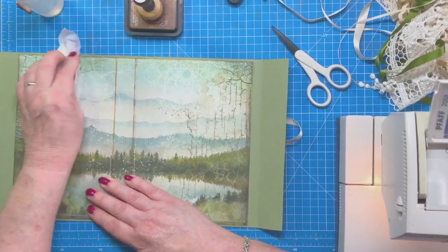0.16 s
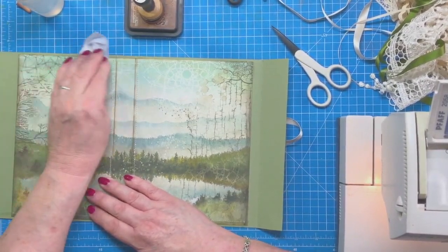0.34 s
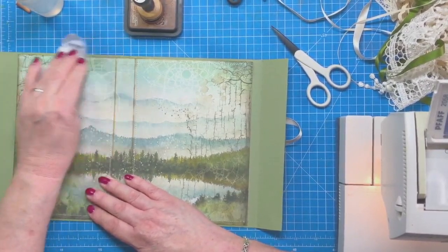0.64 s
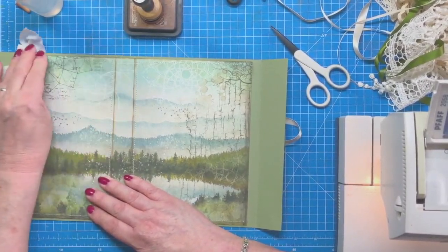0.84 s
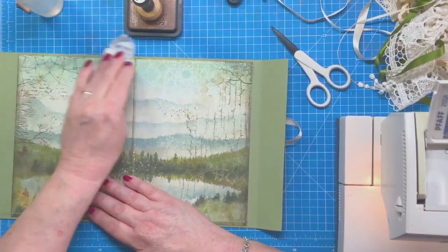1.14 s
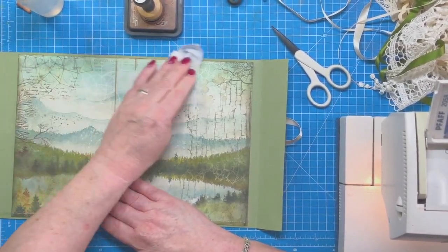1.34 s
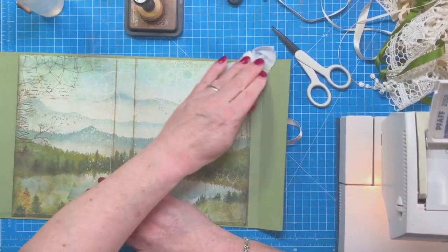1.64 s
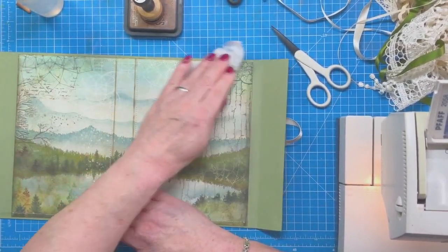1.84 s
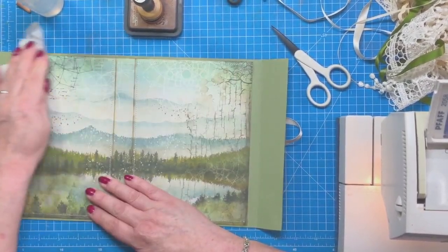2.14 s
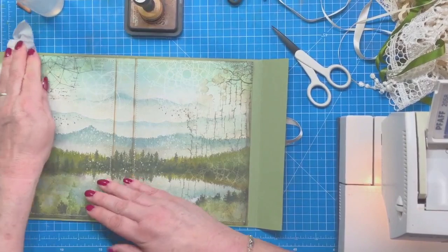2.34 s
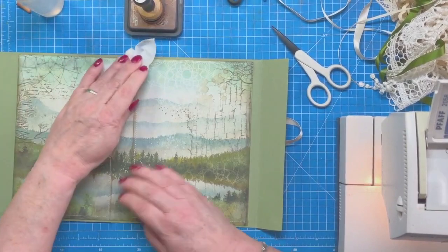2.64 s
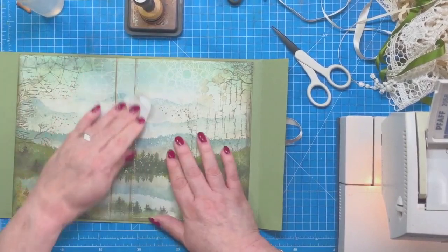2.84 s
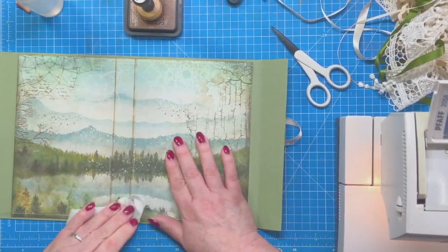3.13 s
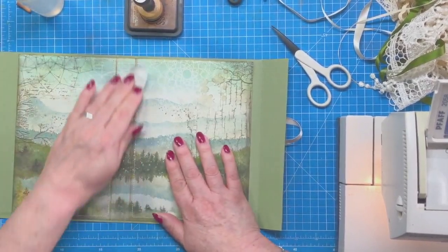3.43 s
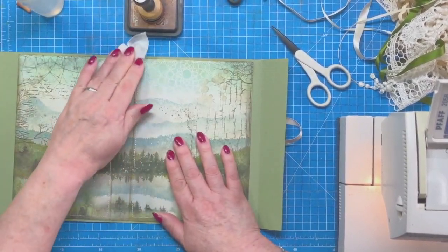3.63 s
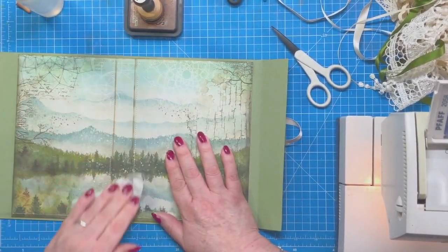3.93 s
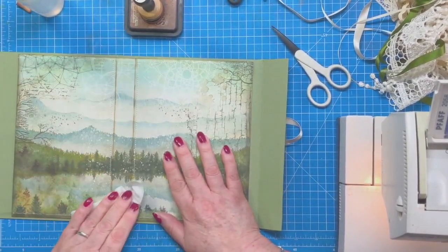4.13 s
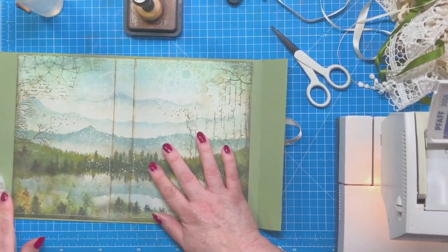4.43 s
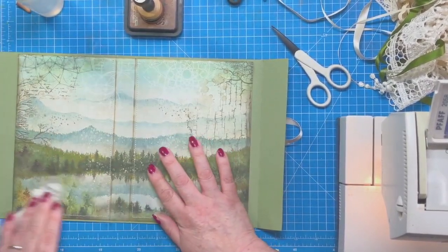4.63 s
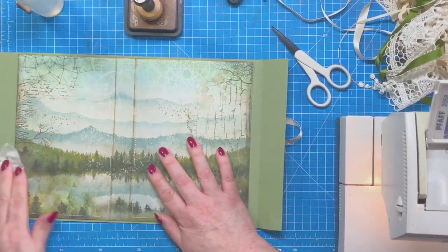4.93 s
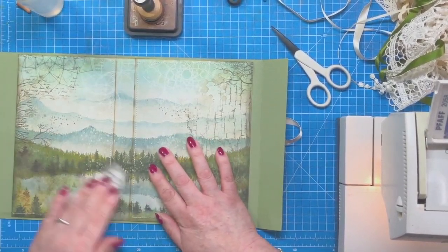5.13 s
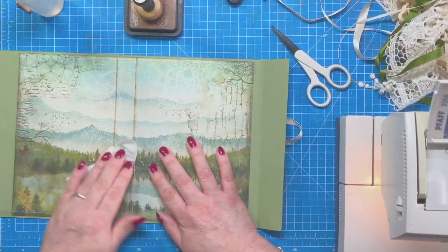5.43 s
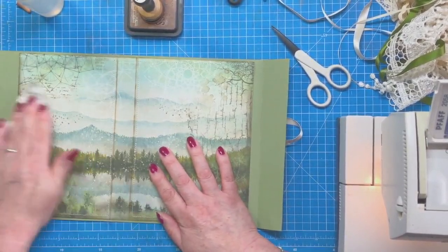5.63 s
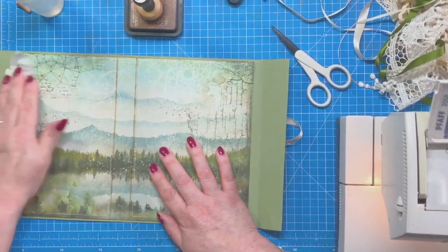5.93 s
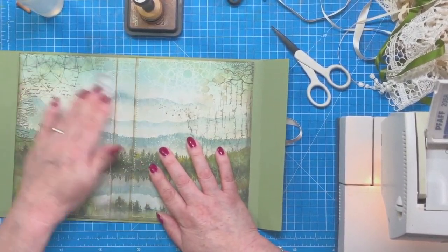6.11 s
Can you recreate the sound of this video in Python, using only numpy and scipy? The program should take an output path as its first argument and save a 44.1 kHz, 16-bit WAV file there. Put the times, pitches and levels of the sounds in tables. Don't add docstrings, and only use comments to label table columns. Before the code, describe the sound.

Close, crisp paper rubbing in uneven strokes with small crackles, a sharp clattering knock past midway, ending in fast, rhythmic scrubbing.

```python
import sys
import numpy as np
from scipy import signal
from scipy.fft import rfft, irfft, next_fast_len
from scipy.io import wavfile
from scipy.ndimage import uniform_filter1d

SR = 44100
rng = np.random.default_rng(int(sys.argv[2]) if len(sys.argv) > 2 else 0)


def how_loud(loudness_db):
    steps = np.asarray(loudness_db, float) / 20
    return 10 ** steps


def unload_wav(signal):
    wavfile.write(
        sys.argv[1],
        SR,
        np.round(np.clip(np.atleast_2d(signal).T, -1, 1) * 32767).astype(np.int16),
    )


N = 276507
USUAL_DB = -45


def level(x, db):
    return x * how_loud(db) / np.sqrt(np.mean(x ** 2))


def along(table):
    s, *columns = np.transpose(table)
    return [np.interp(np.arange(N) / SR, s, c) for c in columns]


def band(x, lo_hz, hi_hz):
    return signal.sosfilt(signal.butter(2, [lo_hz, min(hi_hz, 17000)], "band", fs=SR, output="sos"), x)


def colour(x, points, lo_hz=1., hi_hz=3e4):
    size = next_fast_len(len(x), True)
    hz = np.arange(size // 2 + 1) * SR / size + 1
    f, db = np.transpose(points)
    shape = how_loud(np.interp(np.log(hz), np.log(f), db))
    edges = 1 / np.sqrt((1 + (lo_hz / hz) ** 10) * (1 + (hz / hi_hz) ** 10))
    return irfft(rfft(x, size) * shape * edges, size)[:len(x)]


def walk(rate):
    k = int(SR / rate)
    steps = np.repeat(rng.standard_normal(N // k + 1), k)
    return 1.3 * uniform_filter1d(uniform_filter1d(steps, k), k)[:N]


def fade(t60, count):
    return 1000. ** (-np.arange(count) / SR / t60)


def ring(hz, t60, count=9000):
    return np.sin(2 * np.pi * hz * np.arange(count) / SR) * fade(t60, count)


def blow(hz, cycles):
    t = np.arange(-cycles / 2, cycles / 2, hz / SR)
    return np.cos(2 * np.pi * t) * np.cos(np.pi * t / cycles) ** 2


def add(out, s, sound):
    i = max(int(s * SR), 0)
    out[i:i + len(sound)] += sound[:N - i]


# pitch_hz, level_db (per Hz)
AIR_COLOUR = [(15, -47), (25, -27), (206, 1), (503, -8), (624, -7), (840, -4), (1370, -3.5), (1840, -6.5),
              (2280, -5.5), (3160, -15), (5280, -15), (5880, -11.5), (16000, -13.5)]
# pitch_hz, level_db (rms)
MAINS_HUM = [
    (118.4, -78.5),
    (398.4, -76.5),
    (597.5, -77),
]


def air():
    t = np.arange(N) / SR
    hum = np.zeros(N)
    for hz, db in MAINS_HUM:
        hum += np.sqrt(2) * how_loud(db + 2.0 * walk(5.88)) * np.sin(2 * np.pi * hz * t)
    return level(colour(rng.standard_normal(N), AIR_COLOUR), -61) + hum


# middle_s, low_hz, high_hz, level_db
SIDE_PATCHES = [(.6, 5150, 6300, -56), (.6, 11000, 12400, -57), (1.48, 10300, 12400, -64),
                (1.785, 4160, 6300, -51), (1.785, 7500, 9700, -56), (2.81, 8150, 9700, -54),
                (3.295, 8900, 10400, -55), (3.295, 14400, 15900, -68), (3.57, 5600, 7000, -76),
                (3.875, 4500, 5700, -58), (3.875, 6900, 8300, -60), (3.875, 9000, 11000, -59),
                (3.875, 13700, 15200, -68)]


def side_patches():
    out = np.zeros(N)
    for s, lo_hz, hi_hz, db in SIDE_PATCHES:
        steep_band = [(lo_hz - 30, -120), (lo_hz, 0), (hi_hz, 0), (hi_hz + 30, -120)]
        patch = colour(rng.standard_normal(8192), steep_band)[:2048]
        add(out, s - .023, level(patch, db) * np.hanning(2048) ** .5)
    return out


def stand():
    from_s, rise_s = 5.03, 0.043
    shake = level(colour(rng.standard_normal(N), [(50, 0), (300, 0)], 89, 197), -71.5) * how_loud(6.2 * walk(15))
    onset = np.clip((np.arange(N) / SR - from_s) / rise_s, 0, 1)
    return shake * how_loud(0.49 * (scrubs() - USUAL_DB)) * onset


# start_s, peak_db, favoured_hz, spread_octaves
BOUNCES = [(4.3551, -13, 1950, 0.91), (4.3564, -22, 3800, 0.55), (4.3633, -11, 2030, 0.39),
           (4.3638, -12.5, 3500, 0.46), (4.3665, -20, 2600, 0.74), (4.3678, -13.5, 1010, 0.48),
           (4.3706, -16.5, 700, 0.7), (4.371, -19, 2180, 0.52), (4.3744, -11, 1840, 0.4),
           (4.3782, -16.5, 810, 0.5), (4.3802, -21, 900, .7), (4.3825, -18, 750, 0.49),
           (4.3875, -20, 1100, 0.54), (4.392, -20, 1100, 0.54), (4.4, -28, 900, 0.73),
           (4.409, -24, 1200, 0.52), (4.4345, -24, 2770, .4), (4.4347, -26, 900, .6),
           (4.4368, -26, 2000, .6), (4.4384, -19.5, 720, 0.45), (4.4426, -25.5, 650, .5),
           (4.4443, -21, 900, 0.44), (4.4479, -21, 2300, 0.55), (4.448, -21, 1060, 0.58),
           (4.4508, -34, 1900, .6), (4.4517, -17, 1300, 0.38), (4.4533, -22, 850, 0.36),
           (4.455, -24, 554, 0.65), (4.4575, -29, 700, .6), (4.4592, -27, 604, 0.77),
           (4.4611, -23, 710, 0.35), (4.4637, -26, 850, 0.31), (4.4653, -17.5, 800, 0.75),
           (4.4694, -24.5, 750, 0.88), (4.473, -26, 1000, .6), (4.4939, -26, 2250, 0.58),
           (4.496, -27, 1400, 0.46), (4.4985, -26, 520, 0.98), (4.499, -35.5, 215, 0.36),
           (4.522, -36, 400, 0.83), (4.524, -26, 1730, .6), (4.537, -29, 925, .63),
           (4.577, -39.5, 250, 0.65), (4.62, -50, 300, .8)]
# pitch_hz, level_db, t60_s
BODY_MODES = [(206.3, -4, 0.19), (252, 0, .14), (496, -4, 0.13), (685, -10, .08), (760, -4, 0.042),
              (866, -9, 0.069), (967, -3, .06), (1042, -1, 0.071), (1240, 1, 0.078), (1320, -11, 0.06),
              (1530, -8, 0.036), (1800, -10, 0.031), (1970, 3, 0.02), (2140, 7, .018), (2320, -4, 0.02),
              (2870, -17, .019), (3580, 3, 0.026), (4800, -18, .015)]


def drop():
    out = np.zeros(N)
    for s, db, hz, octaves in BOUNCES:
        sound = np.zeros(9000)
        for mode_hz, mode_db, t60 in BODY_MODES:
            spot_db, spot_shift = rng.standard_normal(2) * [2.5, .01]
            floor_db = -12 if mode_hz < hz else -60
            share_db = max(-6 * (np.log2(mode_hz / hz) / octaves) ** 2, floor_db)
            sound += how_loud(mode_db + share_db + spot_db) * ring(mode_hz * (1 + spot_shift), t60)
        rattle = rng.standard_normal(9000) * fade(0.087, 9000)
        rattle = band(band(rattle, hz / 2 ** octaves, hz * 2 ** octaves), 150, 6000)
        sound = sound + how_loud(8.5) * rattle
        add(out, s, how_loud(db - 6.0) * sound / np.abs(sound).max())
        cycles = 1.57 + hz / 1600
        add(out, s + .0005 - cycles / 1.88 / hz, how_loud(db - 4.5) * blow(0.96 * hz, cycles))
    return out


# start_s, peak_db, pitch_hz, spread_octaves
BUMPS = [(.002, -44, 593, 0.77), (.3675, -41, 590, 0.43), (.38, -49, 450, .6), (.667, -37.5, 800, 1),
         (.668, -49, 390, 0.37), (.88, -50, 352, 0.35), (.96, -47, 1020, .3), (1.02, -57, 270, 0.33),
         (.795, -42.5, 508, 0.37), (0.799, -42.5, 278, 0.57), (.83, -44, 1300, 0.29),
         (.907, -52, 352, 0.65), (.992, -45, 249, 0.36), (1.86, -60, 330, .5), (1.89, -43.5, 510, 1),
         (1.908, -43, 446, 1), (1.924, -42, 290, 0.76), (1.945, -40, 333, 1.2), (1.956, -51, 420, 0.91),
         (2.07, -46, 325, .6), (2.29, -50, 334, 0.83), (1.971, -54, 303, 0.76), (2.215, -55.5, 249, 0.47),
         (2.5874, -32.5, 1100, 0.65), (2.5945, -31, 1360, 0.39), (2.589, -39, 376, 0.36),
         (2.5984, -40, 660, 0.44), (2.5984, -39, 1510, .3), (2.6028, -40, 640, 0.4), (2.61, -38, 800, 0.51),
         (3.252, -46.5, 248, .6), (3.597, -53, 339, 0.5), (4.9, -30.5, 1740, 0.74), (5.222, -41, 915, .8),
         (5.463, -41, 695, 0.72), (5.552, -43, 730, 1.1), (5.729, -45, 254, 0.75),
         (5.872, -46.5, 400, 0.92), (6.05, -55, 276, .55), (6.214, -43, 322, 0.28), (6.214, -40, 1170, 0.7)]


def bumps():
    out, t = np.zeros(N), np.arange(9000) / SR
    for s, db, hz, octaves in BUMPS:
        t60 = 0.042 * (500 / hz) ** 0.71
        scuff = band(rng.standard_normal(9000), hz / 2 ** octaves, hz * 2 ** octaves + 20) * fade(t60, 9000)
        swell = 1 - np.exp(-t * hz / 0.46)
        sound = (ring(hz, t60) + how_loud(2.5) * scuff / np.abs(scuff).max()) * swell
        add(out, s, how_loud(db) * sound / np.abs(sound).max())
    return out


def snaps(table, cycles, ring_db, tail_db, t60, octaves):
    out = np.zeros(N)
    for s, db, hz in table:
        burst = rng.standard_normal(4000) * fade(t60, 4000)
        tail = band(burst, hz / 2 ** octaves, hz * 2 ** octaves + 20)
        add(out, s, how_loud(db + ring_db) * ring(hz, t60, count=4000) + how_loud(db + tail_db) * tail / np.abs(tail).max())
        add(out, s + .0002 - cycles / 2 / hz, -how_loud(db) * blow(hz, cycles))
    return out


# start_s, peak_db, pitch_hz
TICKS = [(0.7623, -26, 7280), (0.7776, -26, 10080), (0.8446, -20.5, 4800), (0.8461, -37, 3660),
         (0.8519, -33, 6890), (0.9649, -31, 5250), (1.8221, -31, 4090), (1.9456, -30, 6680),
         (2.1648, -51, 8740), (2.1832, -39, 7060), (2.2011, -40, 4180), (2.2035, -31, 2430),
         (2.2874, -24.5, 4480), (2.4005, -25, 5810), (2.5886, -27, 2240), (2.5962, -30, 1940),
         (2.9612, -41, 3700), (2.9898, -36, 2760), (3.1133, -47, 2110), (4.0813, -29, 5300),
         (4.0829, -49, 4260), (4.0845, -49, 3960), (4.139, -29, 4610), (4.3099, -33, 3620)]
# start_s, peak_db, pitch_hz
TEARS = [(4.7842, -30, 3400), (4.924, -36, 1570), (4.9522, -28, 4910), (5.0054, -36, 5560),
         (5.0624, -32, 4600), (5.1606, -32, 1940), (5.2565, -20, 7150), (5.2752, -23, 5340),
         (5.2782, -23, 5050), (5.2807, -26, 5510), (5.3056, -23, 4530), (5.3272, -35, 6890),
         (5.3833, -41, 2500), (5.4769, -29, 9800), (5.4821, -22, 5000), (5.4839, -27.5, 3920),
         (5.4887, -31, 3790), (5.4965, -30, 3680), (5.5559, -35, 2630), (5.5973, -26, 6030),
         (5.6016, -15, 6070), (5.8103, -27, 5000), (5.8832, -30, 1940), (5.944, -19.5, 5100),
         (5.9543, -26, 4800), (6.0444, -33, 4430), (6.0462, -34, 3790), (6.0568, -32, 4950),
         (6.1474, -33, 3400)]
# start_s, peak_db, pitch_hz
CRUNCHES = [(.9305, -36, 12200), (2.2008, -45, 3500), (2.2025, -46, 3500), (2.2042, -35, 2310),
            (.368, -44, 1520), (3.596, -39, 4970), (4.706, -40, 3600), (6.206, -37, 3520),
            (2.29, -40, 1420), (2.31, -40, 5800), (5.136, -35, 3540), (5.278, -31, 5200),
            (5.4815, -30, 3850), (5.487, -30, 3700), (5.5548, -34, 2500), (5.559, -36, 1710),
            (5.228, -36, 1700), (4.82, -37.5, 1330), (5.7, -40.5, 1410), (6.12, -41.5, 1500),
            (5.8004, -29.5, 3500), (5.8104, -27, 3300), (5.8194, -32.5, 1710), (6.1475, -34, 3400),
            (6.2174, -32.5, 2280), (6.2216, -32, 5070)]


def folds():
    ticks = snaps(TICKS, cycles=1.7, ring_db=-17, tail_db=-13, t60=.014, octaves=1.3)
    tears = snaps(TEARS, cycles=2.8, ring_db=-8, tail_db=-11, t60=.007, octaves=.7)
    crunches = snaps(CRUNCHES, cycles=1.4, ring_db=-6.0, tail_db=-0.5, t60=0.036, octaves=0.98)
    return ticks + tears + crunches


# start_s, length_s, pitch_hz, level_db
SQUEAKS = [(2.03, .07, 340, -60), (2.28, .06, 1300, -55), (2.84, .05, 2100, -57), (3.108, .13, 1840, -51),
           (3.2, .32, 1750, -55), (3.33, .1, 250, -62), (4.58, .16, 270, -57), (4.71, .1, 3600, -54),
           (4.73, .05, 1650, -54), (4.78, .07, 1650, -50), (4.89, .07, 1600, -51), (5.05, .06, 1600, -54),
           (5.13, .12, 1600, -53), (5.8, .03, 3500, -50)]


def sheet():
    out = np.zeros(N)
    for s, length, hz, db in SQUEAKS:
        n = int(length * SR)
        half_width_hz = 30 + .035 * hz
        rustle = band(rng.standard_normal(18000), hz - half_width_hz, hz + half_width_hz)[1500:1500 + n]
        rise = np.minimum(np.arange(n) / (.01 * SR), 1)
        fall = np.hanning(2 * n)[n:] ** .5
        add(out, s, level(rustle, db) * fall * rise)
    return out


def strokes(table, stop_s):
    t = np.arange(0, N / SR + .002, .001)
    out = np.full(len(t), -68.5)
    for s, length, start_s, early_db, late_db in table:
        moving_s = s + start_s
        held_db = np.interp(t, [moving_s, max(s + length - stop_s, moving_s + .001)], [early_db, late_db])
        starting = np.maximum(1 - (t - s) / start_s, 0)
        stopping = np.maximum(1 - (s + length - t) / stop_s, 0)
        out = np.maximum(out, held_db - 24 * starting ** 1.64 - 25 * stopping ** 1.78)
    return np.interp(np.arange(N) / SR, t, out)


# start_s, length_s, speeding_up_s, early_hiss_db, late_hiss_db
WIPES = [(-.05, .18, .02, -43.5, -48.5), (.172, 0.21, 0.039, -47.5, -48), (.355, .11, 0.013, -52.5, -53.5),
         (.38, 0.31, 0.14, -42.5, -44.5), (.722, 0.21, 0.021, -53, -60.5), (.865, 0.38, 0.064, -45.5, -49),
         (1.15, 0.47, 0.065, -45.5, -49.5), (1.64, 0.19, 0.074, -46, -43), (1.76, 0.37, 0.05, -42, -44.5),
         (2.23, .21, 0.088, -43.5, -42), (2.38, 0.15, .02, -43.5, -51), (2.485, 0.17, 0.028, -50.5, -49.5),
         (2.53, 0.48, 0.096, -43.5, -46), (3.08, 0.34, 0.044, -47.5, -44), (3.34, 0.17, .02, -46, -51),
         (3.575, 0.38, 0.062, -44.5, -47), (3.95, 0.14, 0.075, -53.5, -54), (4.085, 0.28, 0.059, -45, -41),
         (4.33, 0.18, 0.035, -47, -60), (4.455, 0.24, 0.073, -43.5, -44.5)]


def wipes():
    return strokes(WIPES, stop_s=0.055)


# start_s, length_s, speeding_up_s, early_hiss_db, late_hiss_db
SCRUBS = [
    (4.69, .18, 0.033, -44, -43.5),
    (4.857, 0.18, 0.042, -43, -43.5),
    (5.038, 0.18, 0.027, -44, -44.5),
    (5.177, 0.19, 0.05, -44.5, -42.5),
    (5.366, 0.18, 0.027, -45, -41.5),
    (5.54, 0.16, 0.012, -45, -43),
    (5.682, 0.19, 0.043, -41, -45.5),
    (5.853, 0.17, 0.024, -42, -43.5),
    (6.03, 0.16, 0.023, -44, -43.5),
    (6.179, 0.2, 0.034, -45.5, -43),
]


def scrubs():
    return strokes(SCRUBS, stop_s=0.051)


def progress():
    s, length = np.array(sorted(WIPES + SCRUBS)).T[:2]
    t = np.arange(N) / SR
    k = np.searchsorted(s, t) - 1
    return uniform_filter1d(np.minimum((t - s[k]) / length[k], 1) - .5, size=900)


# middle_s, length_s, hiss_db, fineness_db
SURGES = [(.25, .08, 2, 1), (.65, .1, 0.5, -0.5), (2.3, 0.091, 1, -2), (2.4, .08, -0.5, 4),
          (2.5, 0.045, -0.5, -2), (2.618, 0.088, 2, 1.5), (2.82, 0.14, 3, -1), (3.145, 0.068, 1, 2),
          (3.35, .15, 0, -0.5), (3.9, .1, -3.5, -2), (4.807, .06, 1.5, -5), (4.947, .05, -1, 2),
          (5.072, .04, 0.5, 6), (5.152, .05, 0, -1), (5.283, 0.043, 0.5, 1), (5.43, .04, -0.5, 6),
          (5.49, .04, 0.5, -5), (5.63, 0.044, 2, 1), (5.763, .05, -1.5, 5), (5.81, .04, 3, -4),
          (5.92, 0.037, -5, 4), (5.956, .04, 3, 1), (6.06, .03, 0, 1), (6.106, .04, -0.5, 4),
          (6.128, .04, 1.5, -3)]


def surges():
    t, out = np.arange(N) / SR, np.zeros((2, N))
    for s, length, hiss_db, fine_db in SURGES:
        hump = np.cos(np.pi * np.clip((t - s) / (2 * length), -.5, .5)) ** 2
        out = out + np.array([[hiss_db], [fine_db]]) * hump
    return out


def slips(per_s, spread_db, bed_db, tail_s):
    sizes = how_loud(spread_db * np.minimum(rng.exponential(size=N), 4.5))
    hit = (rng.random(N) < per_s / SR) * sizes
    tail = np.exp(-np.arange(200) / (tail_s * SR))
    return rng.standard_normal(N) * (level(np.convolve(hit, tail)[:N], 0) + how_loud(bed_db))


def sliding(db, stick_db, steep):
    return how_loud(db - steep * np.maximum(stick_db - db, 0))


# pitch_hz, level_db (per Hz)
RUB_COLOUR = [(400, -4), (600, -12), (900, -8), (1300, -3), (1800, -1.5), (2600, -1.5), (3600, 0),
              (5000, -1), (6400, -0.5), (7600, -3), (9200, -1.5), (12100, -2.5), (14500, -7.5),
              (16000, -16)]


def patchy(x, edges, rate, patch_db):
    out = np.zeros(N)
    for lo, hi in zip(edges, edges[1:]):
        out += colour(x, RUB_COLOUR, lo, hi) * how_loud(patch_db * walk(rate))
    return level(out, 0)


# pitch_hz, level_db (per Hz)
CARD_COLOUR = [(53, -51), (90, -21), (108, -6), (237, -1), (270, 1.5), (400, 0), (541, -9), (1000, -1),
               (1300, -33), (2200, -120)]
# time_s, pressure_db, fold_fineness_db, lean_on_card_db
HAND = [(0, -1, -3.5, 8), (.3, 0, -4.5, -1.5), (.8, 1, -4.5, 6.5), (1.3, 2.5, -4, 2),
        (1.55, -0.5, -16, -3.5), (2, -2, -6, 1.5), (2.3, 3, -10, -6), (2.4, -1, -2, 3),
        (2.85, 0.5, -6.5, 0.5), (3.4, 0, -2.5, 4), (3.65, 0, -9, 3.5), (3.85, -0.5, -0.5, 4),
        (4.15, -1.5, -12, -6.5), (4.5, 2.5, -15, 9), (4.9, -0.5, -8.5, -2), (5.4, 2, -5, 1.7),
        (5.65, 0, -5.5, 2.7), (6.27, -2.5, -5, 3)]


def tissue():
    press_db, top_db, lean_db = along(HAND)
    bear_db, fine_db = surges()
    hiss_db = np.maximum(wipes(), scrubs()) + bear_db
    top_db = top_db + fine_db + 2.5 * progress() + 0.38 * (hiss_db + 34.5)
    scrape_db = -50 + press_db + 0.51 * (hiss_db - USUAL_DB)
    rumble_db = -64.5 + lean_db + 0.49 * (hiss_db - USUAL_DB)
    fibres = slips(per_s=840, spread_db=3.0, bed_db=19.0, tail_s=0.00033)
    ridges = slips(per_s=150, spread_db=6.0, bed_db=3.5, tail_s=0.0012)
    grip = how_loud(.9 * walk(40))
    speed = sliding(hiss_db, stick_db=-87, steep=0.14) * grip
    hiss = patchy(fibres, (3700, 5200, 7000, 9300), rate=11, patch_db=1.3) * speed
    top = level(colour(fibres, RUB_COLOUR, 9300), 0) * speed * how_loud(top_db + 0.14 * walk(27))
    scrape = patchy(fibres, (550, 1100, 1700, 2500, 3700), rate=12, patch_db=1.7)
    scrape = scrape * sliding(scrape_db, stick_db=-53.0, steep=1.0) * grip
    rumble = level(colour(ridges, CARD_COLOUR, 90, 750), 0) * how_loud(rumble_db + 2.5 * walk(13))
    return hiss + top + scrape + rumble


def scene():
    room_t60_s, room_db = 0.24, -17
    near = folds() + bumps() + drop() + tissue() + sheet()
    tail = band(rng.standard_normal(12000) * fade(room_t60_s, 12000), 210, 5900)
    walls = signal.fftconvolve(near, tail / np.sqrt(np.sum(tail ** 2)))[:N]
    bass_cut = signal.butter(5, 150, "high", fs=SR, output="sos")
    heard = signal.sosfilt(bass_cut, near + how_loud(room_db) * walls)
    return heard + air() + stand() + side_patches() * np.array([[1], [-1]])


def low_pass(x):
    return signal.sosfilt(signal.butter(12, 16160, fs=SR, output="sos"), x)


def record(dry):
    treble_cut = signal.ellip(10, .2, 70, 15930, fs=SR, output="sos")
    mix = signal.sosfilt(treble_cut, dry)
    return low_pass(mix)


dry = scene()
out = record(dry)
unload_wav(out)
```